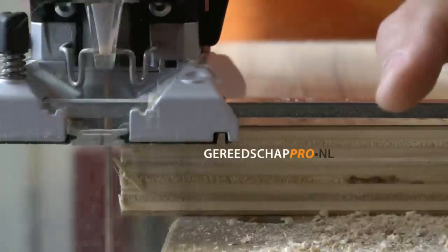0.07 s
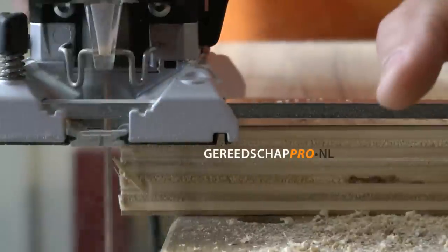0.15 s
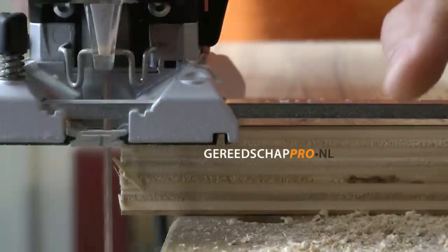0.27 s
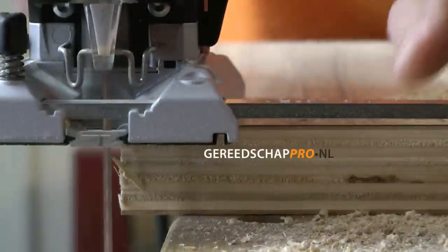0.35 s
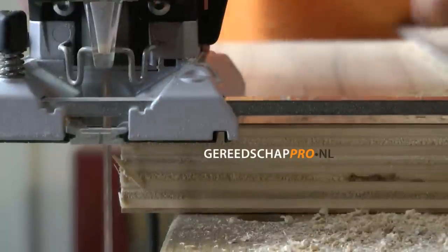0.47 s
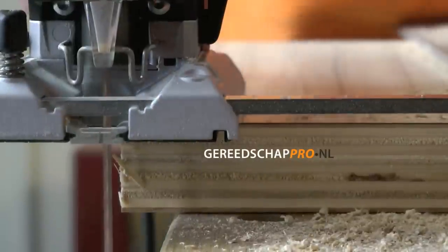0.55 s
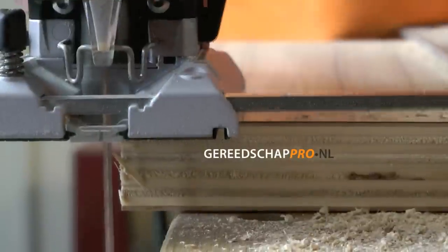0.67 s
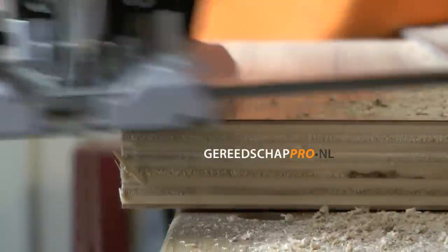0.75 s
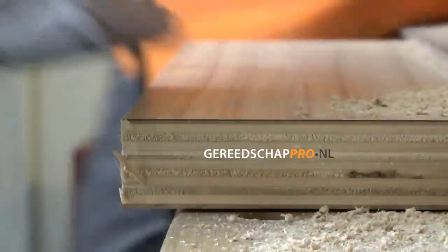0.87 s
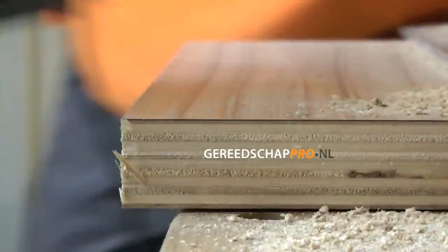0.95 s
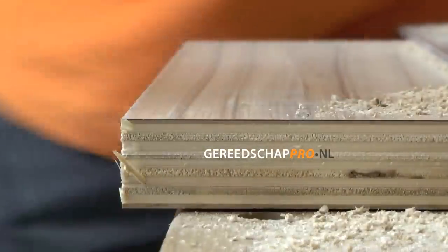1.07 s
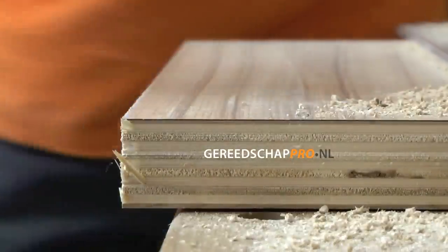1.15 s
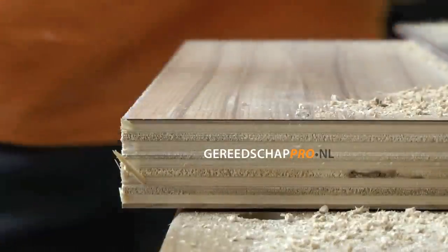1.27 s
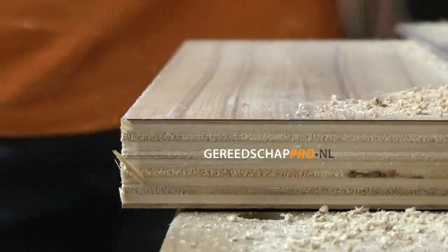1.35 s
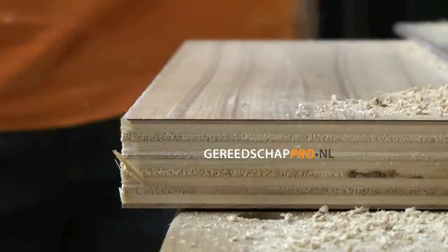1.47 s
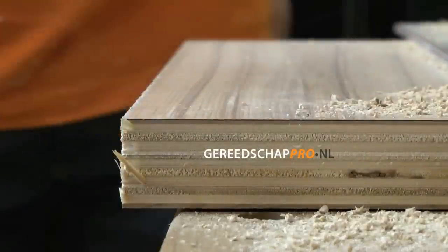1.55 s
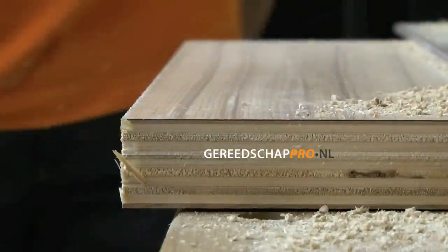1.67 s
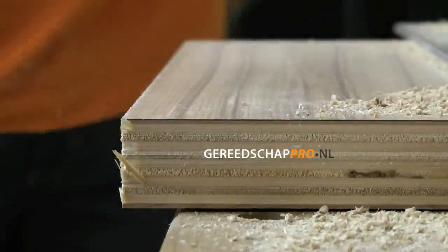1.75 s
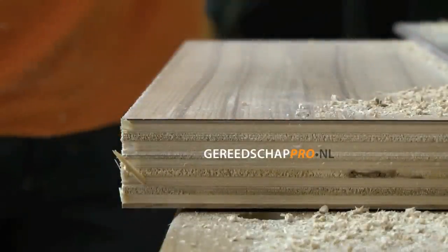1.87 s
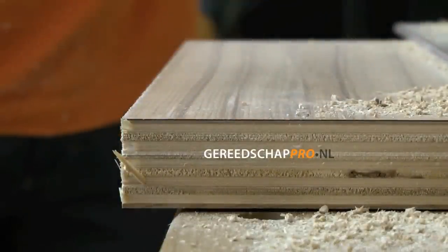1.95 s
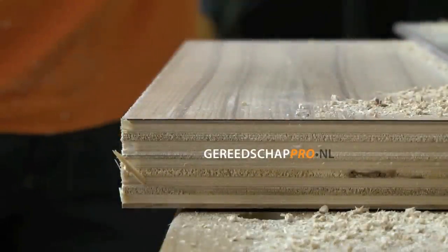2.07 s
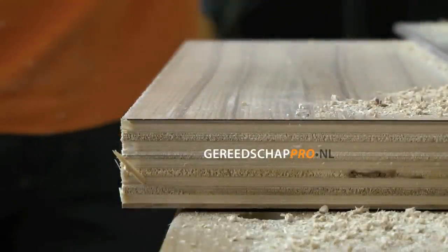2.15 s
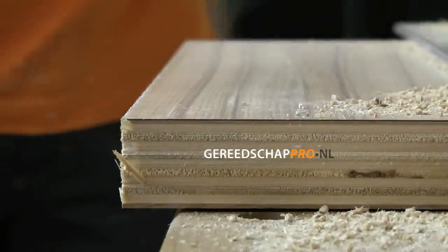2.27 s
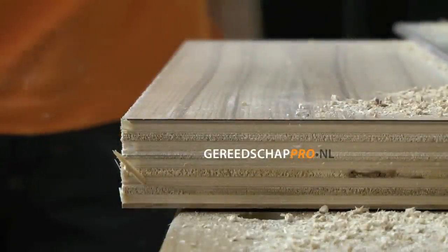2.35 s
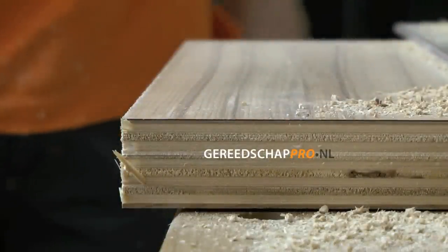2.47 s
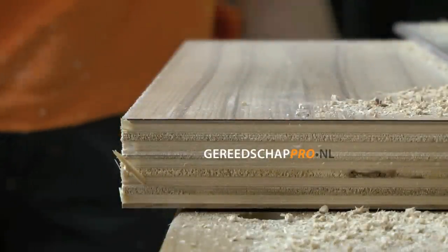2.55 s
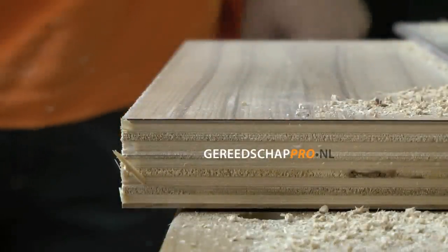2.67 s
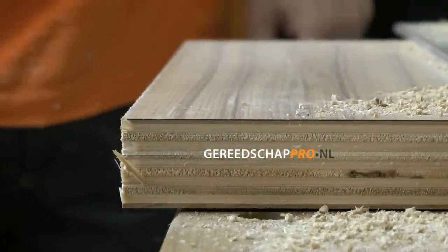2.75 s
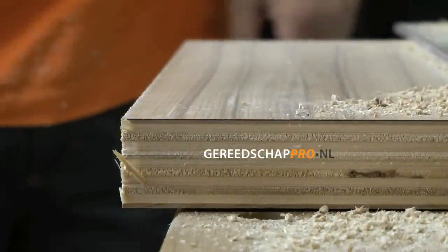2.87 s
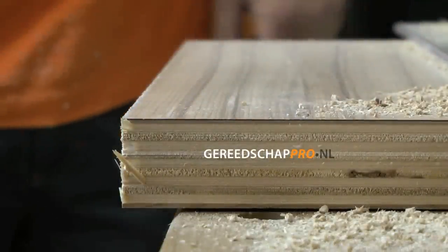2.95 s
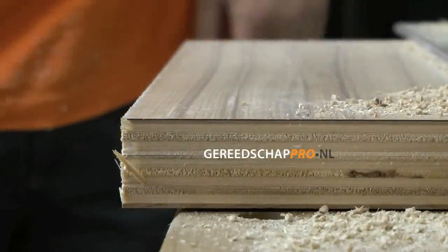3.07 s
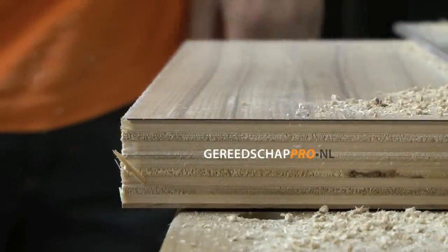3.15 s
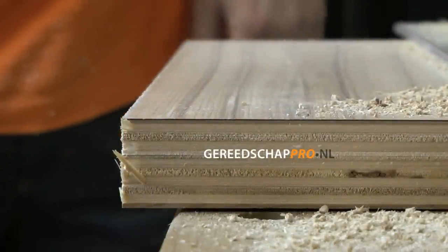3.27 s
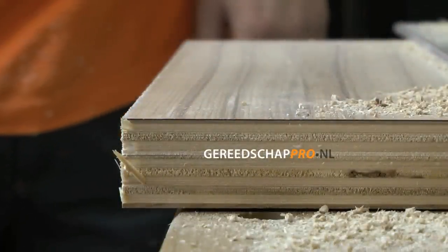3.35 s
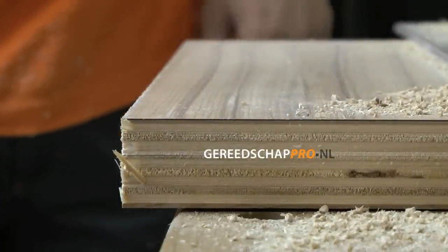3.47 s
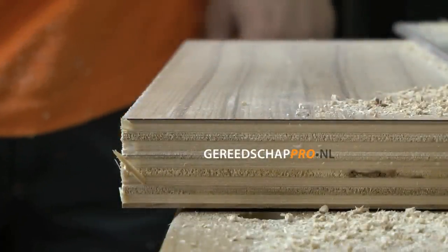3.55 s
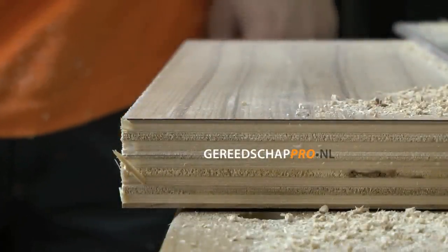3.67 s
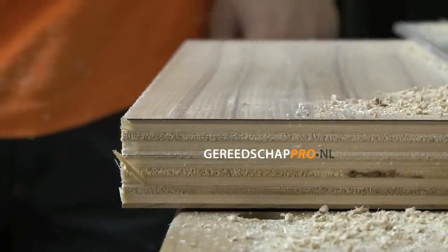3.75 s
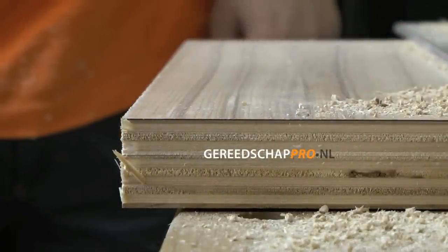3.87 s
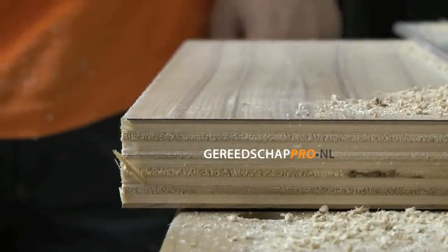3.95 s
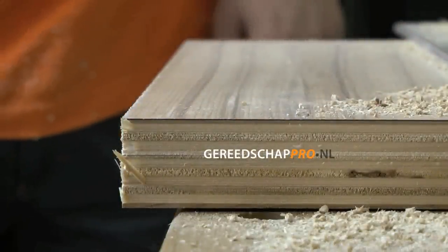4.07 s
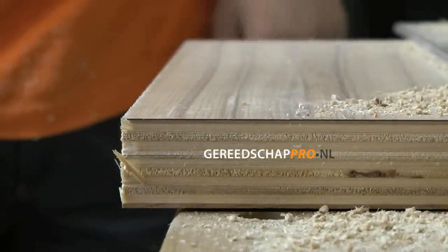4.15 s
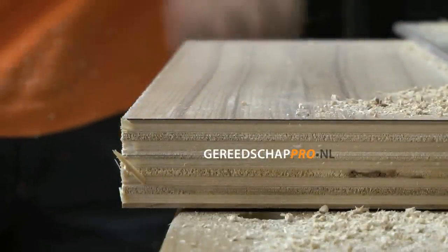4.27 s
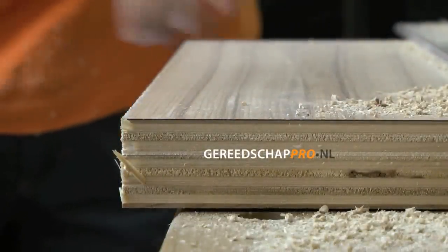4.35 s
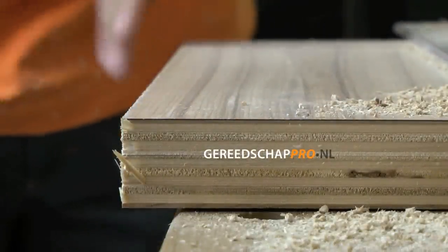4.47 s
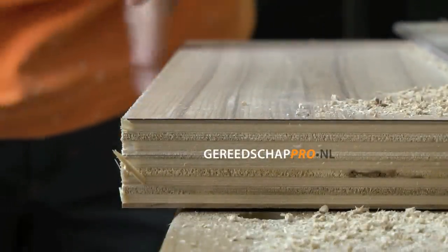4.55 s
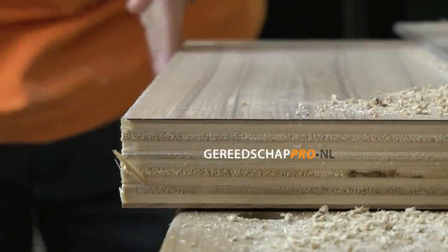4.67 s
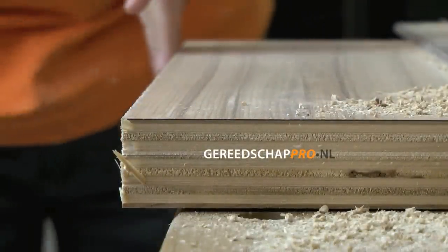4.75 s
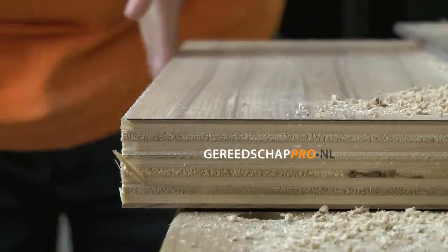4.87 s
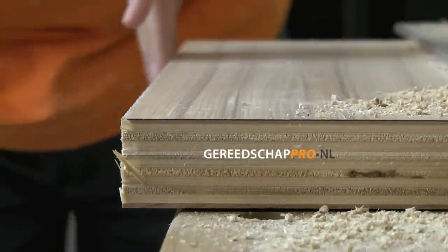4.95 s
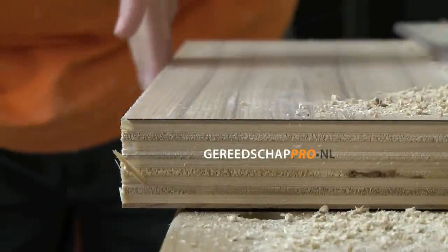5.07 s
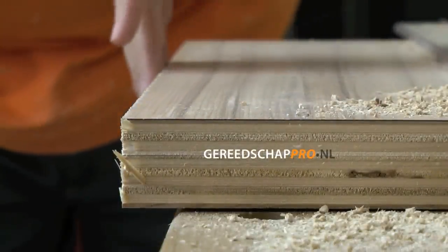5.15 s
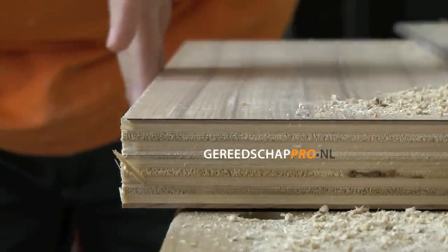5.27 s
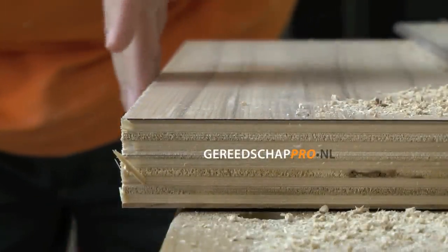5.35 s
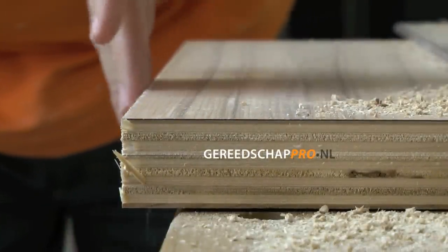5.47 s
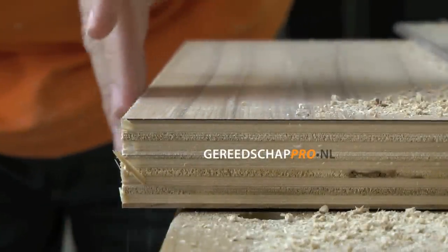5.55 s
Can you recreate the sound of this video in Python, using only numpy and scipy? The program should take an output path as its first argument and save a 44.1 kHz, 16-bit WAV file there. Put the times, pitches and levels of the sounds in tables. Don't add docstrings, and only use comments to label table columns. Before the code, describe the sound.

A jigsaw coasts down from a loud rattling whine, an off-cut knocks the bench, the blade clunks, then a hand softly brushes dusty wood.

```python
import sys
import numpy as np
from scipy import signal
from scipy.fft import rfft, irfft
from scipy.io import wavfile
from scipy.ndimage import uniform_filter1d

SR = 44100
rng = np.random.default_rng(int(sys.argv[2]) if len(sys.argv) > 2 else 0)


def to_linear_factor(level_db):
    exponent = np.asarray(level_db, float) / 20
    return 10 ** exponent


def waveform_to_disk(signal):
    frames = np.transpose(np.atleast_2d(signal))
    scaled = np.clip(frames, -1, 1) * 32767
    samples = np.round(scaled).astype(np.int16)
    wavfile.write(sys.argv[1], SR, samples)


N = 246959
T = np.arange(N) / SR

# t/s, tooth rate f/Hz
MESH_SPEED = [(0, 2610), (.3, 2280), (.45, 1960), (.85, 1620), (1.06, 1285), (1.5, 925), (1.92, 635),
              (2.4, 380), (3.3, 120)]
# t/s, level/dB
SAW_LEVEL = [(0, -19.5), (.3, -16.5), (.37, -17.5), (.44, -23.5), (.85, -21), (1.22, -18.5), (1.49, -18),
             (1.8, -23.5), (2.18, -27.5), (2.5, -32), (2.66, -34.5), (2.79, -38), (3.0, -46)]
# f/Hz, level/dB per Hz
SAW_COLOUR = [(120, -41), (250, -20), (450, -21.5), (900, -1), (1350, -4.5), (2400, -0.5), (3600, -4.5),
              (6600, -11.5), (9000, -22), (11700, -26.5), (15700, -42.5)]
# f/Hz, width/Hz, lift/dB
HOUSING = [(868, 23, 3.5), (1130, 130, 3.5), (1667, 91, 4.5), (2160, 36, 2), (2440, 120, 4),
           (3000, 310, 3.5)]
SAW_SEAMS = [380, 640, 1400, 4000, 9500]
# f/Hz, level/dB against the rattle
WHINE = [(600, -37), (710, -12.5), (1150, -10), (1290, -25.5), (1490, -17.5), (1700, -9.5), (2450, -3.5),
         (3500, -17.5)]
# t/s, lift/dB
SURGES = [(.19, -0.5), (.27, 3.5), (2.02, 2.5), (2.33, 1.5), (2.47, 3.5), (2.65, 2)]
# start t/s, end t/s, f/Hz, level/dB
SINGS = [(-0, 0.323, 455, -37), (0.04, 0.368, 860, -30.5), (0.087, 0.372, 1155, -29),
         (0.61, 0.81, 865, -31.5), (0.762, 0.86, 3080, -24), (.9, 1.102, 982, -45),
         (0.88, 1.79, 1612, -30.5), (1.34, 1.94, 2650, -32), (1.747, 2.7, 7200, -43.5),
         (1.5, 2.55, 8800, -47), (1.695, 2.074, 2250, -32), (2.162, 2.388, 1650, -36.5),
         (2.164, 2.224, 2180, -39), (2.15, 2.95, 6200, -49.5), (2.364, 2.53, 1200, -41),
         (2.42, 2.515, 4610, -35.5), (2.53, 2.61, 2250, -33.5), (2.543, 2.768, 3150, -40),
         (2.71, 2.962, 2350, -52), (2.78, 2.98, 1650, -43.5)]
# t/s, peak level/dB
CLUNKS = [
    (2.4495, -21),
    (2.6405, -24),
    (3.0145, -21),
]
# f/Hz, level/dB, t60/s
ROD = [(980, -5, .03), (1637, -10, .03), (1890, 0, .022), (2070, 0, .025), (2336, -6, .02),
       (3100, -4, .022), (3300, -7, .018)]
# t/s, level/dB of each of the three bench modes, crack level/dB
KNOCKS = [
    (0.368, -34.5, -27, -18.5, 1),
    (.09, -57.5, -37, -57, -44),
    (0.554, -48, -33.5, -36, -46),
    (.66, -63, -41, -34, -43.5),
    (.79, -59, -65, -40.5, -23.5),
    (1.87, -56.5, -44, -41, -54),
    (1.97, -59, -44, -34, -52),
    (2.02, -60, -62, -36, -53.5),
]
# f/Hz, t60/s
BENCH = [(122, 0.28), (205, 0.32), (334, 0.16)]
# f/Hz, level/dB, t60/s
OFFCUT = [(1750, -7.5, 0.024), (2737, -3.5, 0.15), (3650, -8, 0.025), (4460, -9, .02)]
# peak t/s, rise/s, fall/s, level/dB
HAND = [
    (3.45, .05, 0.24, -65),
    (4.02, .02, 0.13, -74),
    (4.325, .003, 0.067, -62.5),
    (4.63, 0.15, 0.56, -54),
    (4.645, .02, 0.057, -48),
    (4.71, .03, .03, -50.5),
    (4.91, .02, .04, -47),
    (5.06, 0.28, 1.2, -53),
]
# f/Hz, level/dB per Hz
HAND_COLOUR = [(300, -2), (600, 1), (1200, -4), (2400, -0.5), (4500, -3), (6800, -7.5), (8500, -13.5),
               (14000, -25)]
# t/s, f/Hz, level/dB
SQUEAKS = [(4.6, 1750, -54), (4.71, 2338, -44.5), (4.91, 2470, -48.5)]
# t/s, peak level/dB, f/Hz
CHIPS = [(4.319, -41.5, 1260), (4.325, -47.5, 5460), (4.606, -48, 1750), (4.636, -30, 4000),
         (4.697, -45.5, 5000), (4.706, -45.5, 2600), (4.748, -37, 3000), (4.904, -43, 3770),
         (4.945, -47.5, 3000), (5.026, -39, 6300), (5.068, -48, 584)]
# f/Hz, level/dB
MAINS = [(50, -70), (150, -62), (200, -67.5), (250, -67.5), (300, -74.5), (450, -75), (550, -80),
         (650, -81.5), (750, -79), (850, -89)]
# f/Hz, level/dB
FAN = [(70.4, -63.5), (93.5, -65), (281, -64.5), (329, -70.5), (365, -82.5)]
# f/Hz, level/dB per Hz
SHOP_COLOUR = [(12, -48.5), (20, -21.5), (70, 0.5), (226, -17), (275, -4.5), (395, -25), (442, -15.5),
               (494, -28), (552, -18), (690, -21), (15700, -31)]


def saw_motion():
    hz, = curves(MESH_SPEED)
    level_db, = curves(SAW_LEVEL)
    return hz, np.log2(hz / 1200), level_db


def saw():
    hz, octaves, level_db = saw_motion()
    strikes = np.diff(np.floor(np.cumsum(hz) / SR), prepend=0)
    teeth = strikes * rng.standard_normal(N) * np.sqrt(np.minimum(hz / 900, 1))
    chatter = grains(3.0 * hz + 4000, spread_db=1.1)
    source = unit(teeth) * 0.71 + unit(chatter) + .5 * rng.standard_normal(N)
    rumble, board, shell, gear, air, top = split(colour(source, SAW_COLOUR, HOUSING), SAW_SEAMS)

    surge_db = sum(db * np.exp(-((T - s) / .025) ** 2) for s, db in SURGES)
    gear_db = level_db + surge_db
    shell_db = gear_db - 10 - 0.5 * octaves

    board_db = gear_db - 25.5 - 5.5 * np.maximum(octaves, -2 * octaves - 3.7)
    cutting_db, freed_db, sole_lifts_s, lift_s = 10.5, 14, 0.77, .05
    sole_down = np.clip((sole_lifts_s - T) / lift_s + .5, 0, 1)
    board_db += np.where(T < KNOCKS[0][0], cutting_db, freed_db) * sole_down

    air_db = -4.5 + 1.5 * np.minimum(octaves, 0) - surge_db
    air_db -= 1.5 * np.exp(-((T - .62) / .15) ** 2)
    top_db = air_db - 19 + 1.5 * octaves

    gear_stop, air_stop = (np.clip((end - T) / (end - 3), 0, 1) ** 2 for end in (3.12, 3.3))
    body = to_linear_factor(gear_db) * gear + to_linear_factor(shell_db) * shell
    body += to_linear_factor(board_db) * board + to_linear_factor(level_db - 35.5) * rumble
    hiss = to_linear_factor(gear_db) * (to_linear_factor(air_db) * air + to_linear_factor(top_db) * top)
    return gear_stop * body + air_stop * hiss


def whine():
    hz, octaves, level_db = saw_motion()
    whine_db, over_db = (at_pitch(WHINE, k * hz) for k in (1, 2))
    over_db = over_db - 1 + 14 * np.minimum(octaves, 0)
    tones = to_linear_factor(level_db + whine_db) * rough(hz, 24 + .008 * hz)
    tones += to_linear_factor(level_db + over_db) * rough(2 * hz, .03 * hz)
    rotor = np.sin(2 * np.pi * np.cumsum(hz) / SR / 5)
    sole_contact = np.clip((.4 - T) / 0.033, 0, 1)
    return tones + to_linear_factor(-40) * sole_contact * (0.48 + blur(43)) * rotor


def sings():
    out = np.zeros(N)
    for start, end, f, db in SINGS:
        width_hz = 41 * (f / 1000) ** 1.4
        swell = np.sin(np.pi * np.clip((T - start) / (end - start), 0, 1)) ** .5
        out += to_linear_factor(db) * swell * rough(f, 20 + .7 * width_hz)
    return out


def rod():
    hits = np.zeros(N)
    for s, db in CLUNKS:
        chance = rng.standard_normal((24, 2)).T
        gaps = .0062 * (1 + .3 * chance[0, 1:]).clip(.3)
        after = np.r_[0, np.cumsum(gaps)]
        size_db = np.r_[0, -6 + 1.5 * chance[1, 1:]] - 20 * after - 1900 * after ** 2
        hits[((s + after) * SR).astype(int)] += to_linear_factor(db + size_db) * np.sign(chance[0])
    bass_cut = signal.butter(4, 750, "high", fs=SR, output="sos")
    return signal.sosfilt(bass_cut, signal.fftconvolve(hits, ring(ROD))[:N])


def cracks():
    out, t = np.zeros(N), T[:int(.12 * SR)]
    splinter = [(300, -12.5), (1200, -0.5), (2700, 14), (8000, 6.5), (12000, -16), (15000, -11), (16500, -27.5)]
    for s, *_, crack_db in KNOCKS:
        snap = (t / .0025) * np.exp(1 - t / .0025)
        rattle = .33 * np.exp(-t / .035)
        contact = rng.standard_normal(len(t)) * (snap + rattle)
        crack = signal.fftconvolve(contact, ring(OFFCUT)) * .02
        crack[:len(t)] += 0.29 * colour(contact, splinter)
        add(out, s + 0.00073, to_linear_factor(crack_db) * crack)
    return out


def bench():
    out = np.zeros(N)
    for k, (s, *mode_db, _) in enumerate(KNOCKS):
        attack_s = .015 if k else .002
        for (f, t60), db in zip(BENCH, mode_db):
            thud = ring([(f, 0, t60)])
            add(out, s, to_linear_factor(db) * thud * np.clip(T[:len(thud)] / attack_s, 0, 1))
    landing_s = KNOCKS[0][0]
    sway = np.sin(np.pi * (T / .095) ** .36) * np.exp(-T / .1)
    kick = np.exp(-((T - .004) / 0.0011) ** 2)
    add(out, landing_s - .002, -to_linear_factor(-28.5) * sway - to_linear_factor(-16) * kick)
    add(out, landing_s, to_linear_factor(-22.5) * ring([(300, 0, .08)]))
    return out


def hand():
    press = swells(HAND)
    dust = colour(unit(grains(12000, spread_db=2.0)) + .5 * rng.standard_normal(N), HAND_COLOUR)
    _, low, high = split(dust, [380, 1100])
    slow_press = uniform_filter1d(press, int(.3 * SR))
    out = press * high + to_linear_factor(-12) * slow_press * low

    squeak_hz, _ = curves(SQUEAKS)
    squeak = swells([(s, 0.027, 0.027, db) for s, _, db in SQUEAKS])
    out += squeak * blur(220) * np.sin(2 * np.pi * np.cumsum(squeak_hz) / SR)

    for s, db, f in CHIPS:
        modes = [(f, 0, 40 / f), (.7 * f, -3, .005), (1.35 * f, -2, .005), (1.9 * f, -5, .004)]
        add(out, s, to_linear_factor(db) * ring(modes, seconds=.05))
    return out


def shop():
    hum = sum(to_linear_factor(db) * np.sin(2 * np.pi * (f * T + rng.random())) for f, db in MAINS)
    spikes = np.diff(np.sign(np.sin(2 * np.pi * 50 * T + 1)), prepend=1)
    buzz = colour(spikes, [(300, -26.0), (700, -2.0), (1500, -4.0), (4000, -15.5), (9000, -32.5)])
    drift = np.cumsum(1 + 0.013 * walk(4.8)) / SR
    fan = sum(to_linear_factor(db + 3.0 * walk(4.6)) * np.sin(2 * np.pi * (f * drift + rng.random())) for f, db in FAN)
    hiss = colour(rng.standard_normal(N), SHOP_COLOUR)
    return np.sqrt(2) * (hum + fan) + to_linear_factor(-73) * unit(buzz) + to_linear_factor(-61) * unit(hiss)


def room(x):
    t60_s, wet_db = .35, -9
    t = T[:int(.8 * SR)]
    tail = rng.standard_normal(len(t)) * 1000. ** (-t / t60_s) * np.clip(t / 0.0028 - 1, 0, 1)
    dull = uniform_filter1d(tail, size=3)
    tail = dull + (tail - dull) * np.exp(-t / 0.076)
    wet = signal.fftconvolve(x, tail / np.sqrt(np.sum(tail ** 2)))[:N]
    return (x + to_linear_factor(wet_db) * wet) / np.sqrt(1 + to_linear_factor(2 * wet_db))


def unit(x):
    return x / np.sqrt(np.mean(x ** 2))


def curves(table):
    s, *columns = np.transpose(table)
    return [np.interp(T, s, c) for c in columns]


def at_pitch(points, hz):
    f, db = np.transpose(points)
    return np.interp(np.log(hz), np.log(f), db)


def colour(x, points, peaks=()):
    hz = np.maximum(np.arange(len(x) // 2 + 1) * SR / len(x), 1)
    db = at_pitch(points, hz)
    for f, width, lift_db in peaks:
        db = db + lift_db / (1 + ((hz - f) / (width / 2)) ** 2)
    return irfft(rfft(x) * to_linear_factor(db), len(x))


def split(x, seams_hz):
    octave = np.log2(np.maximum(np.arange(N // 2 + 1) * SR / N, 1))
    spectrum = rfft(x)
    above = [1] + [1 / (1 + np.exp(-9 * (octave - np.log2(f)))) for f in seams_hz] + [0]
    bands = [irfft(spectrum * (lo - hi), N) for lo, hi in zip(above, above[1:])]
    return [b / np.sqrt(uniform_filter1d(b ** 2, SR // 4) + 1e-18) for b in bands]


def walk(rate):
    k = int(SR / rate)
    held = np.repeat(rng.standard_normal(N // k + 1), k)
    return unit(uniform_filter1d(uniform_filter1d(held, k), k)[:N])


def blur(width_hz):
    return unit(signal.sosfilt(signal.butter(2, width_hz, fs=SR, output="sos"), rng.standard_normal(N)))


def rough(hz, width_hz):
    phase = np.cumsum(hz + width_hz * blur(120)) / SR
    return np.sqrt(2) * to_linear_factor(1.5 * walk(40)) * np.sin(2 * np.pi * phase)


def grains(per_s, spread_db):
    chance = rng.random((N, 3)).T
    size = to_linear_factor(-spread_db * np.log(chance[2] + 1e-9))
    return (chance[0] < per_s / SR) * np.sign(chance[1] - .5) * size


def ring(modes, seconds=0.32):
    t = T[:int(seconds * SR)]
    y = sum(to_linear_factor(db) * np.sin(2 * np.pi * f * t) * 1000. ** (-t / t60) for f, db, t60 in modes)
    return y / np.abs(y).max()


def swells(rows):
    power = 0
    for s, rise, fall, db in rows:
        power = power + to_linear_factor(2 * db) * np.exp(-2 * np.where(T < s, (s - T) / rise, (T - s) / fall))
    return np.sqrt(power)


def add(out, s, sound):
    i = int(s * SR)
    out[i:i + len(sound)] += sound[:N - i]


def scene():
    rest_db, duck_db, recover_from_s, recover_s = 1, -6.5, 0.85, 0.77
    gain_db = rest_db + duck_db * np.clip(1 - (T - recover_from_s) / recover_s, 0, 1)
    near = saw() + whine() + sings() + rod() + cracks() + hand()
    return (room(near) + bench() + to_linear_factor(gain_db) * shop())[None]


def roll_off(x):
    return signal.sosfilt(signal.butter(12, 15830, fs=SR, output="sos"), x)


def record(dry):
    mix = 0.98 * np.tanh(.93 * dry)
    return roll_off(mix)


dry = scene()
out = record(dry)
waveform_to_disk(out)
```